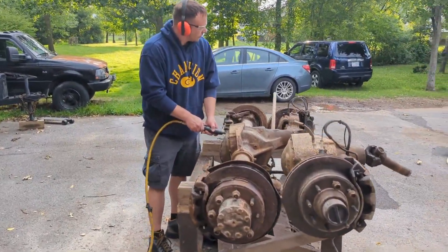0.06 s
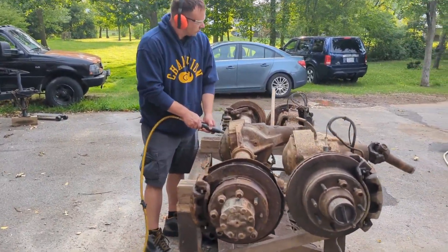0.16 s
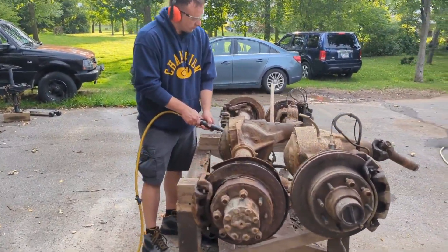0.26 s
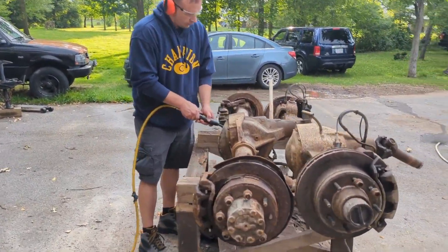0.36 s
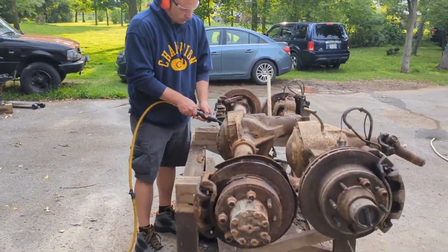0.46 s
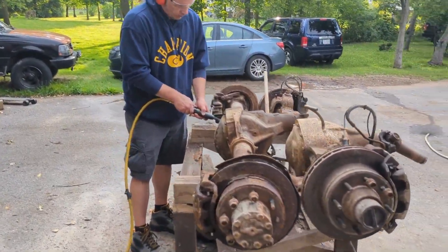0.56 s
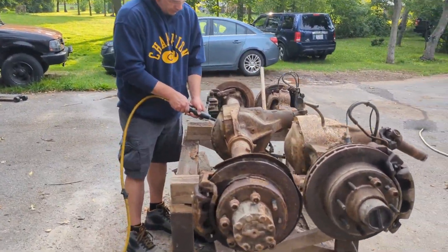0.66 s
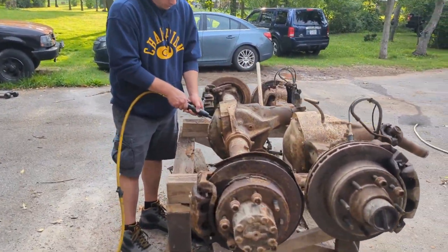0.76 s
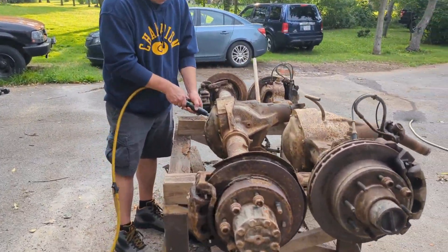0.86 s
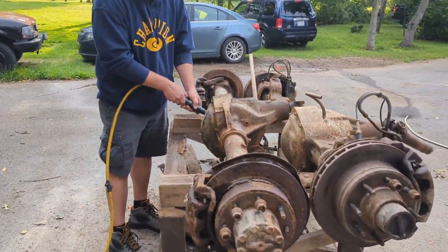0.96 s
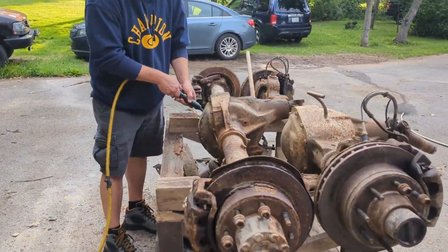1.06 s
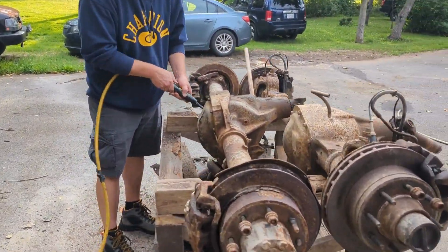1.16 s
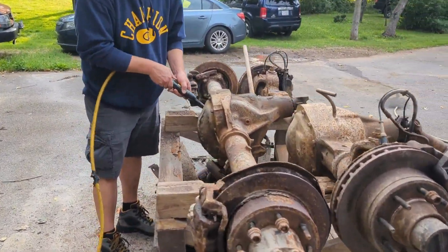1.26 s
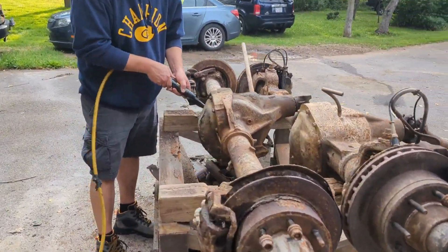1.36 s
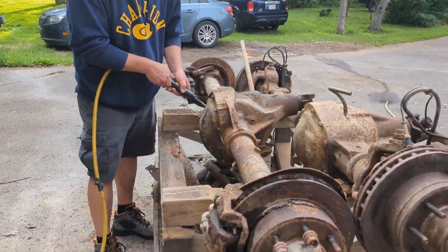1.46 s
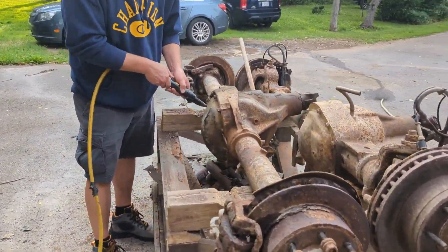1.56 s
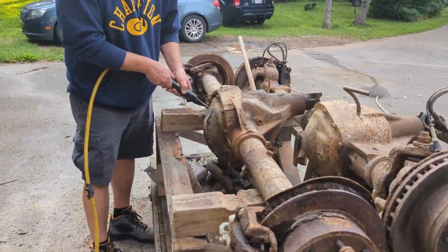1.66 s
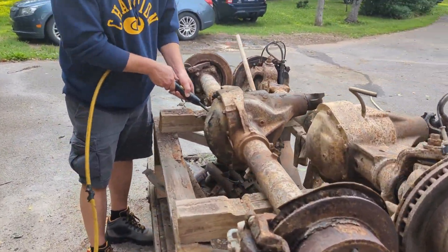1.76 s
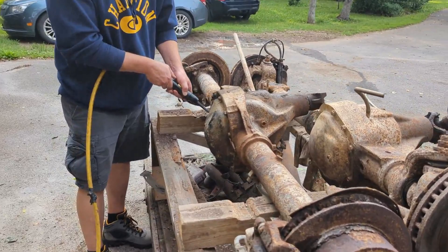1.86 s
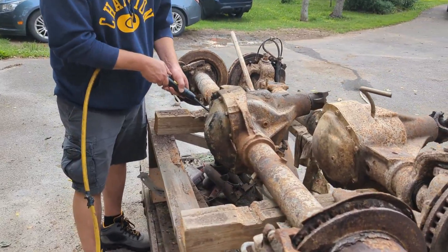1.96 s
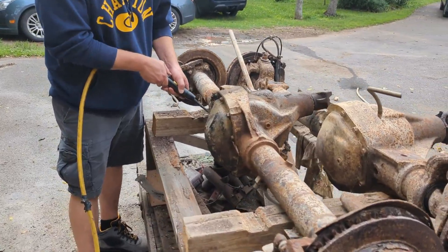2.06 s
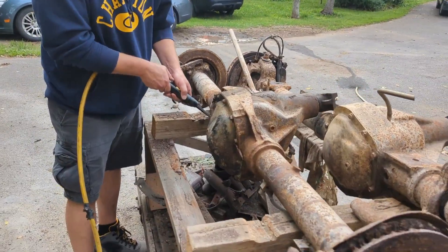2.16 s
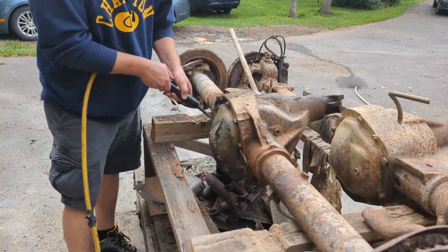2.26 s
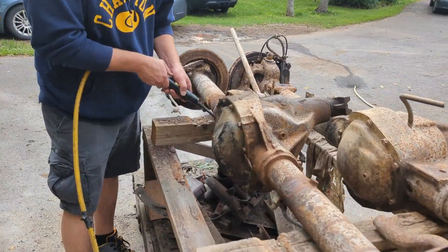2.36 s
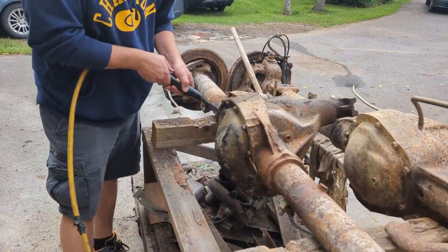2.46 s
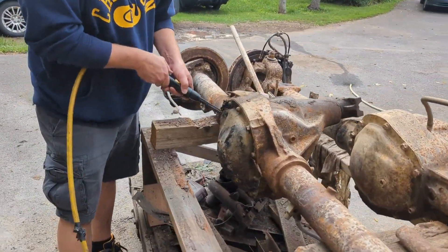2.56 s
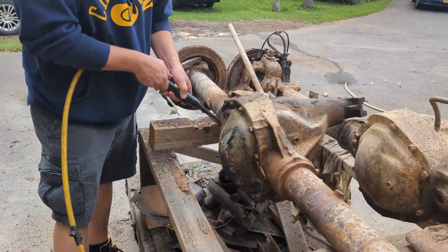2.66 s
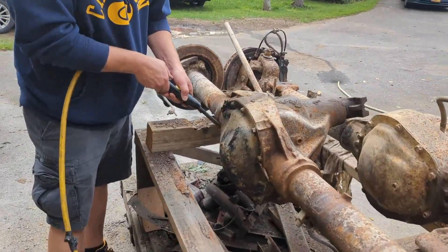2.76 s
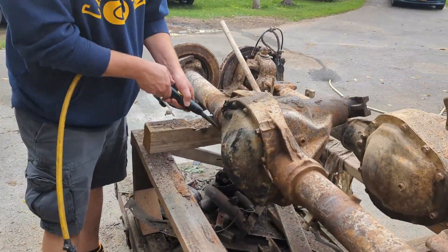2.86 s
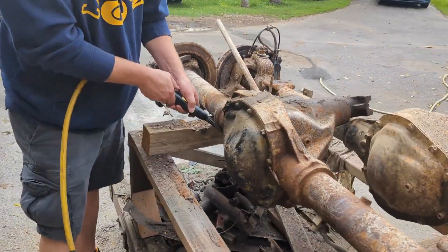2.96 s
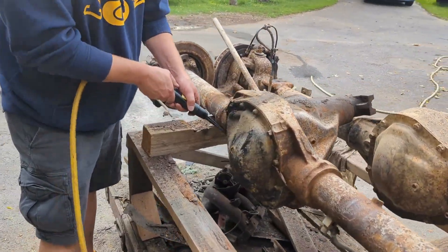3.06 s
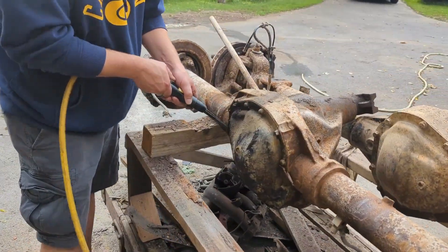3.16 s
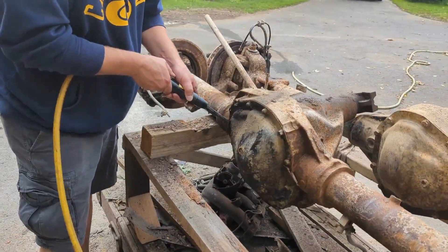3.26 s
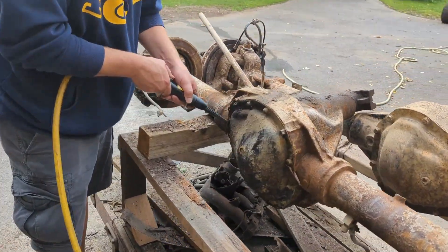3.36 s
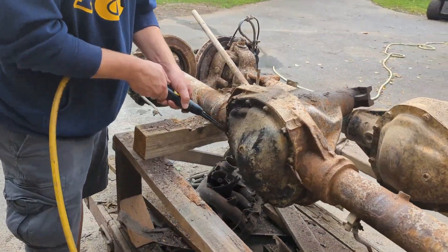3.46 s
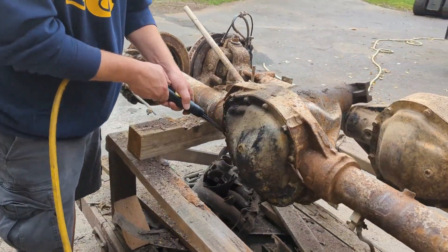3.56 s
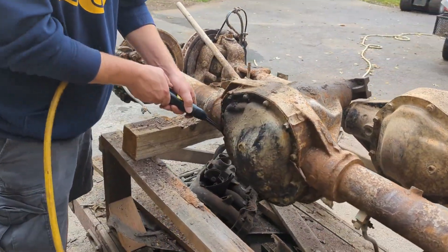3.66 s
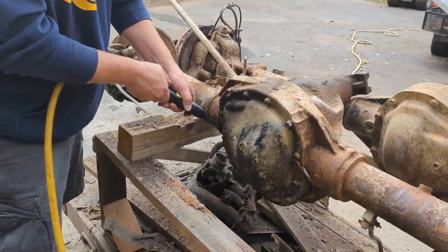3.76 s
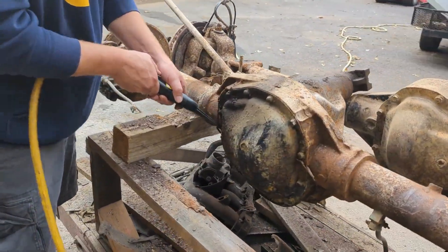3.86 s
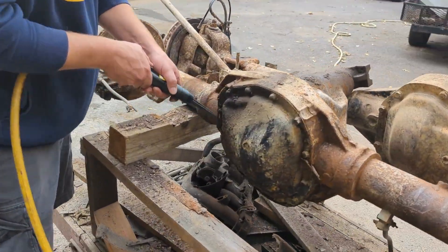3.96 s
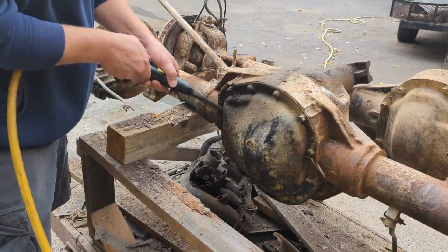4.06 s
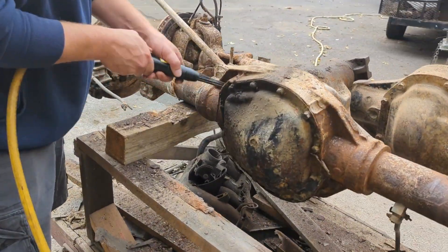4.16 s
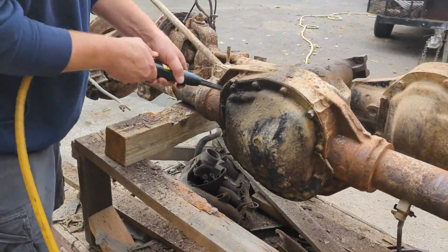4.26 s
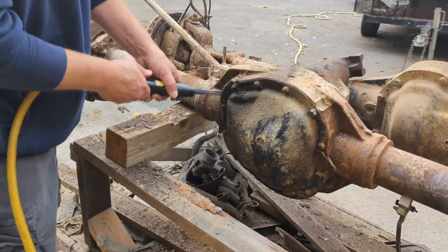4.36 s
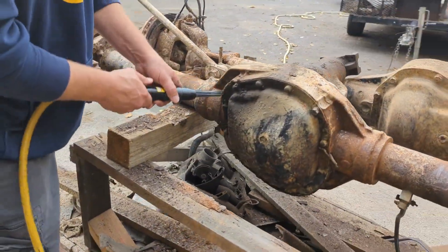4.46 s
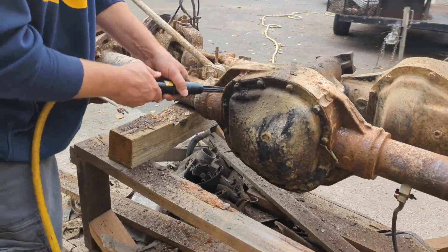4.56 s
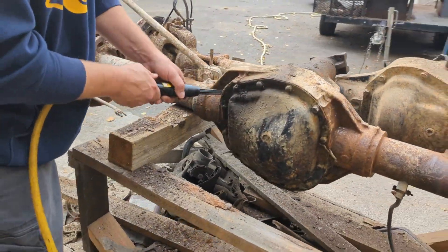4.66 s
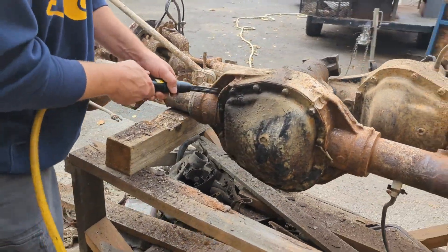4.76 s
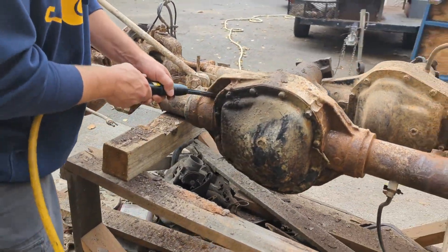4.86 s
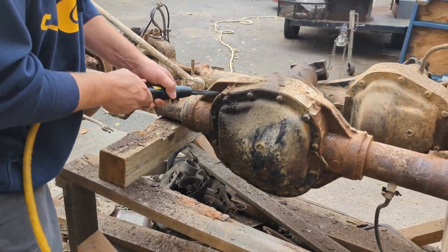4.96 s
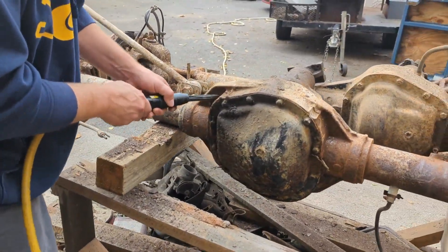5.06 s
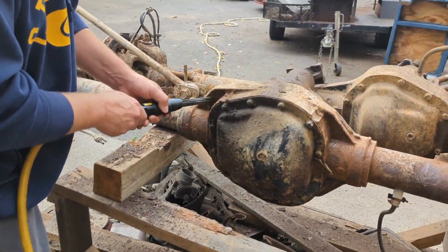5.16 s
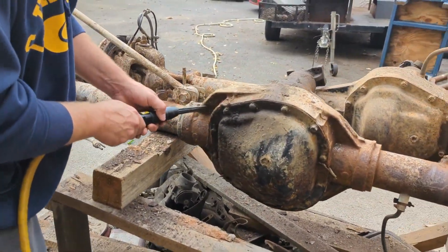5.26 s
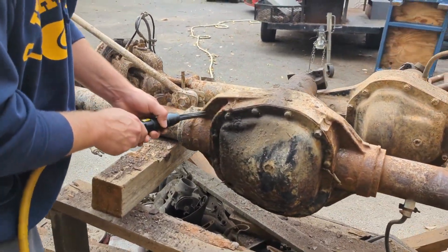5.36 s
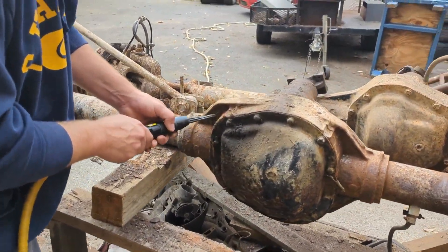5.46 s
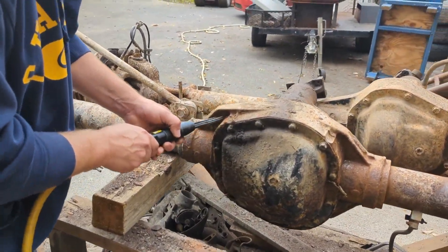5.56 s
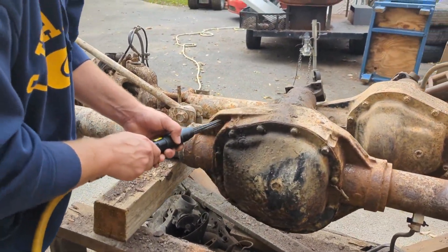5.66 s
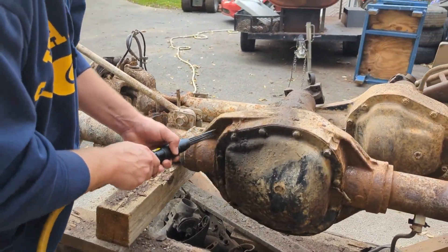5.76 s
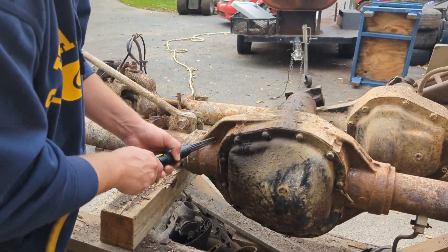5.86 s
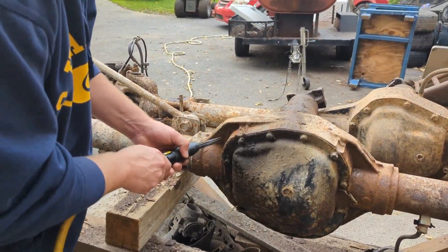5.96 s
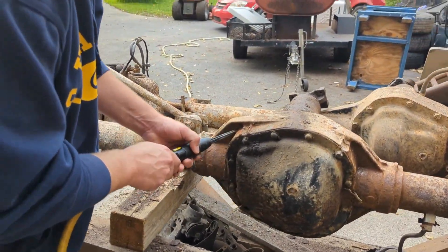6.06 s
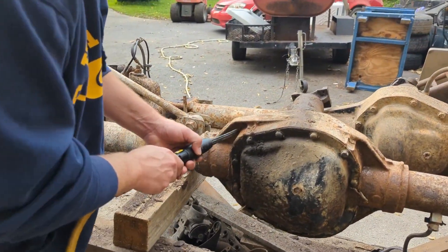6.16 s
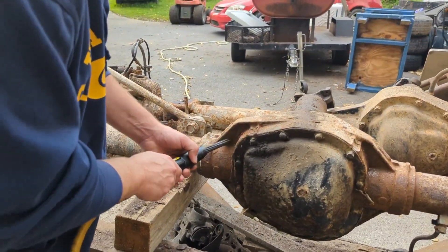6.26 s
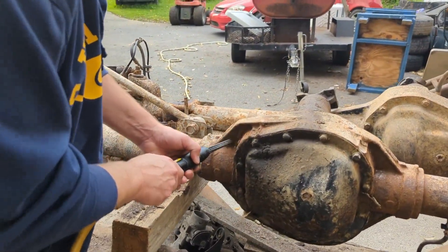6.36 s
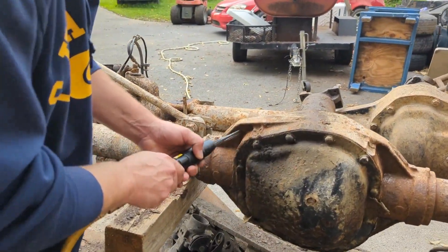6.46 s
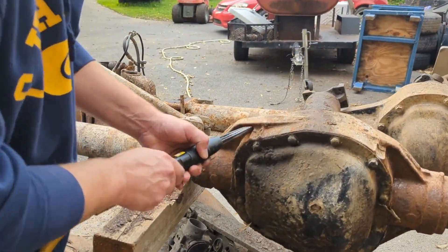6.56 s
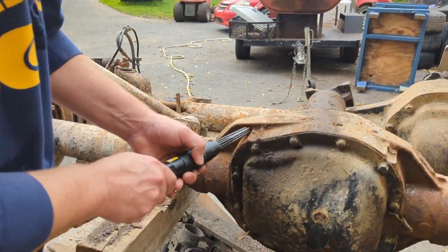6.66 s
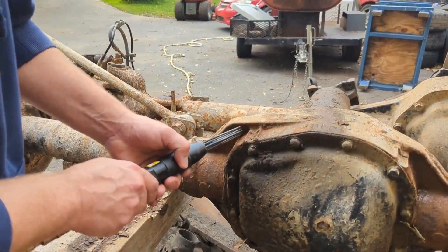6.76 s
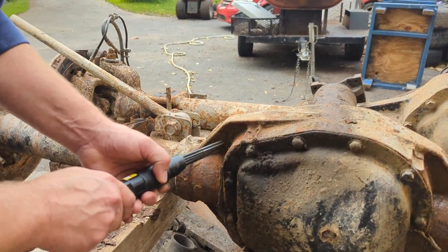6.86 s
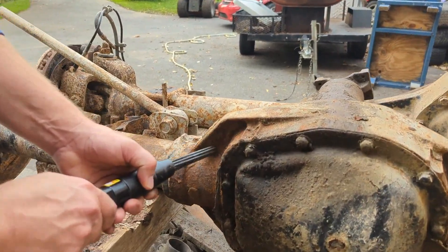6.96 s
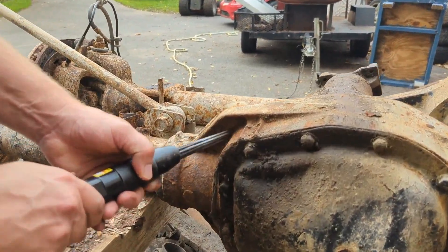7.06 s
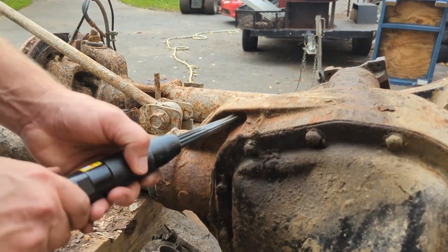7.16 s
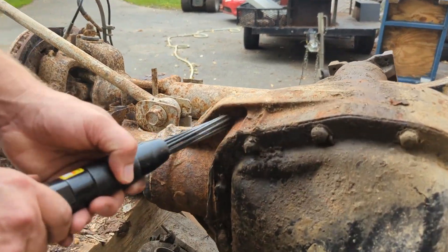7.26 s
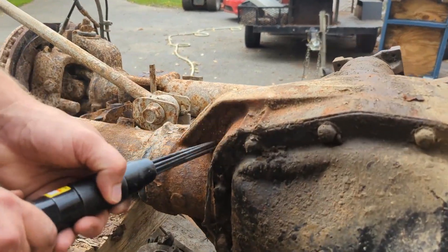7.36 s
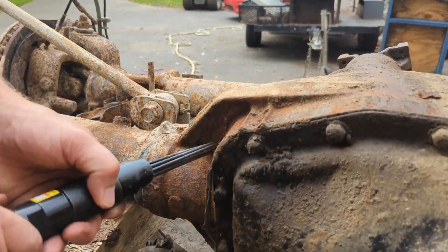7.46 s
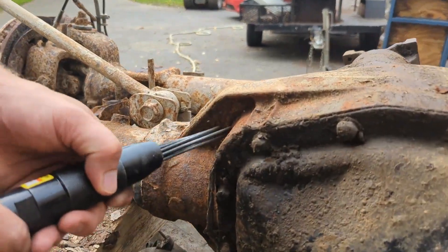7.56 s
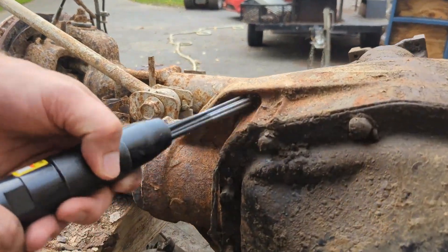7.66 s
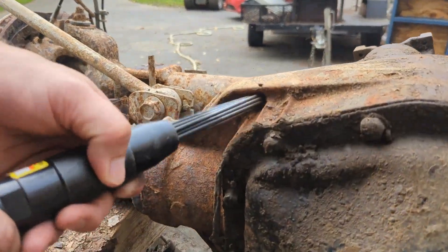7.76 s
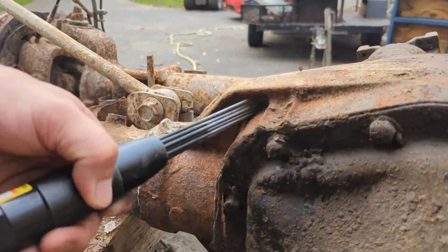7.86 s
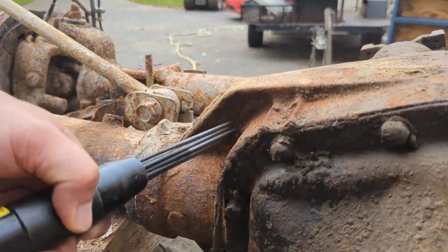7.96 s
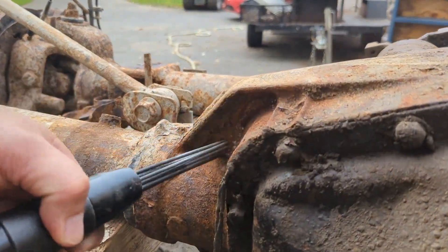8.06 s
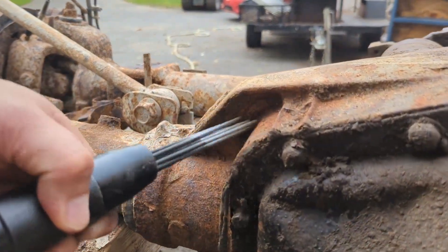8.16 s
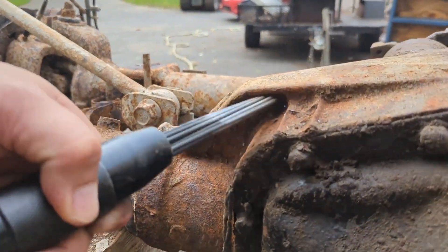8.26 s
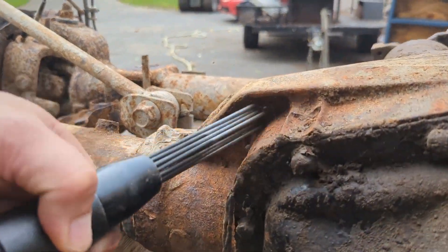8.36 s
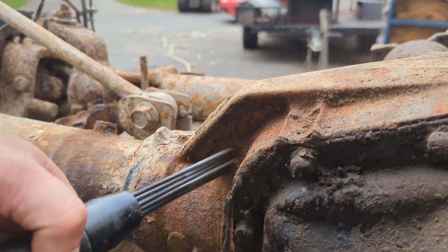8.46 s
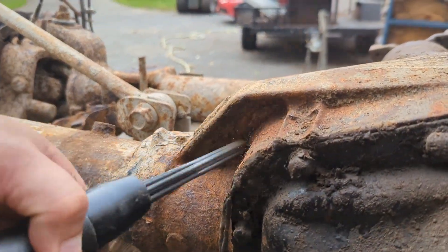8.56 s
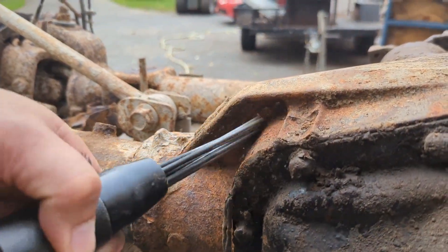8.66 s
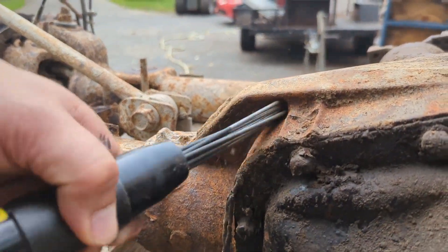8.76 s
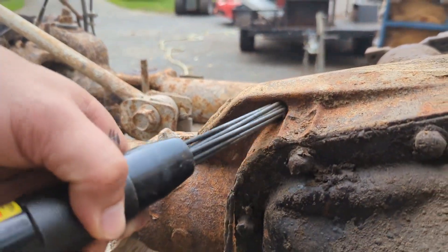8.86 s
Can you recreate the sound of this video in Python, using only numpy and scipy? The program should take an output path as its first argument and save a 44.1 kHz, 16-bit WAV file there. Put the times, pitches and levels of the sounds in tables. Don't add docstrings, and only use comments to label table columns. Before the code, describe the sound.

A pneumatic needle scaler is already running at 0 s and never stops through 8.9 s. About 65 blows a second fuse into a coarse, buzzing metallic rattle, each blow a cluster of needle hits followed by a looser rebound. From 0 to 2.2 s it is moderately loud, with low exhaust thump and hum, soft air rumbles at 0.7, 1.1 and around 2 s, and hollow housing knocks. Around 2.3 s the bass drops, briefly returns near 2.7 s, then stays thin while the needle clatter grows louder and harsher, peaking around 4 s. The pace sags slightly until 4.3 s. From 5 to 7 s the bright chatter shifts and rings as the phone swings round. After 6.9 s it rattles more; by 7.5 s low end returns, the pace quickens slightly, and a crunchy, strong hollow knock dominates from 8 s. Faint outdoor hush remains; close, dry stereo.

```python
import sys
import numpy as np
from scipy import signal
from scipy.fft import rfft, irfft, next_fast_len
from scipy.io import wavfile
from scipy.ndimage import uniform_filter1d, map_coordinates

SR = 44100
rng = np.random.default_rng(int(sys.argv[2]) if len(sys.argv) > 2 else 0)


def volts_from_db(level):
    exponent = np.asarray(level, float) / 20
    return 10 ** exponent


def materialize(psi):
    bounded = np.clip(np.atleast_2d(psi).T, -1, 1)
    quanta = np.round(bounded * 32767).astype(np.int16)
    wavfile.write(sys.argv[1], SR, quanta)


N = 392931
TIME = np.arange(N) / SR


def curves(table):
    s, *columns = np.transpose(table)
    return [np.interp(TIME, s, column) for column in columns]


def bumps(table):
    coarse = TIME[::64]
    swell = sum(height * np.exp(-((coarse - s) / half) ** 2) for s, half, height in table)
    return np.interp(TIME, coarse, swell)


def walk(rate):
    hold = int(SR / rate)
    steps = np.repeat(rng.standard_normal(N // hold + 1), hold)
    return 1.29 * uniform_filter1d(steps, hold)[:N]


def level(x, db=0):
    return x * volts_from_db(db) / np.sqrt(np.mean(x ** 2))


def colour(x, table):
    size = next_fast_len(N)
    hz, db = np.transpose(table)
    bins_hz = np.arange(size // 2 + 1) * SR / size
    gain = volts_from_db(np.interp(np.log(bins_hz + 1), np.log(hz), db))
    return irfft(rfft(x, size) * gain, size)[..., :N]


def resonate(x, hz, width):
    return signal.lfilter(*signal.iirpeak(hz, hz / width, SR), x)


def decay(x, seconds):
    return signal.lfilter([1], [1, -np.exp(-1 / (seconds * SR))], x)


def pair(likeness):
    mid, side = rng.standard_normal((2, N))
    c = np.clip(likeness, 0, 1)
    return np.sqrt(1 + c) * mid + np.sqrt(1 - c) * side * np.array([[1], [-1]])


def later(x, samples):
    right = map_coordinates(x[1], [np.arange(N) - samples], order=3, mode="nearest")
    return np.array([x[0], right])


# time_s, cut_db
GUARD = [(0, -2.5), (1.9, 1.5), (2.18, -3), (2.31, -10.5), (2.55, -13), (2.68, -1), (2.98, -11),
         (3.45, -14.5), (6.8, -13.5), (7.4, -8), (7.54, -0.5), (7.79, 1.5), (8.74, 3), (8.91, 4)]


def wind_guard():
    return curves(GUARD)[0]


# freq_hz, level_db per Hz
YARD = [(15, -55), (25, -15), (144, -14), (193, -4), (386, -8), (505, -13), (954, 0.5), (1570, -13),
        (2500, -6), (3250, -31), (5500, -120)]


def yard(guard_db):
    return level(colour(pair(1.0), YARD), -38) * volts_from_db(0.43 * guard_db)


# centre_s, half_length_s, level_db
GUSTS = [
    (.72, 0.021, 11),
    (1.12, 0.033, 8),
    (1.55, 0.034, -13),
    (1.85, 0.027, 4),
    (1.97, 0.052, 8),
    (2.15, 0.041, 11),
]


def buffet(guard_db):
    rumble = level(resonate(pair(0.08), 77, 61), -43.5)
    return rumble * volts_from_db(guard_db + bumps(GUSTS))


# multiple of the blow rate, level_db, share of the guard's cut
EXHAUST_LINES = [
    (1, -37, 1.33),
    (2, -42, 0.99),
                 (3, -37.5, 0.63), (4, -46.5, 0.64), (5, -41.5, 0.62), (6, -57.5, 0.26), (7, -63.5, 0.41),
        (8, -50, 0.18), (10, -50, 0.12)]


def exhaust(turns, guard_db):
    lines = 0
    for multiple, db, share in EXHAUST_LINES:
        line_db = db + share * guard_db + 1.47 * walk(14)
        lines = lines + volts_from_db(line_db) * np.sin(2 * np.pi * multiple * turns + 0.4 * walk(30))
    return np.sqrt(2) * lines


BLOWS_HZ = 64.5
# time_s, blows gained on the steady rate
PACE = [(0.0, -0.15), (0.059, -0.07), (0.204, -0.19), (0.308, 0.24), (0.347, 0.11), (0.413, 0.15),
        (0.642, -0.21), (0.707, -0.11), (0.748, 0.18), (0.971, 0.0), (1.07, -0.2), (1.154, -0.64),
        (1.354, -0.92), (1.49, -0.81), (1.599, 0.04), (1.751, 0.09), (1.796, 0.27), (2.084, -0.25),
        (2.227, 0.01), (2.293, -0.02), (2.399, -0.7), (2.467, -0.85), (2.782, -0.38), (2.95, -0.34),
        (3.018, -0.36), (3.358, -0.98), (3.44, -0.97), (3.535, -0.7), (3.667, -0.78), (3.707, -0.94),
        (3.771, -0.96), (3.925, -1.56), (4.213, -1.93), (4.238, -1.89), (4.261, -1.62), (4.302, -1.86),
        (4.422, -1.47), (4.503, -1.56), (4.565, -1.25), (4.583, -1.49), (4.671, -1.41), (4.769, -0.96),
        (4.966, -1.22), (5.179, -1.2), (5.458, -1.44), (5.993, -1.14), (6.057, -1.23), (6.141, -1.1),
        (6.626, -1.03), (6.853, -0.28), (7.274, -0.03), (7.639, 0.77), (7.828, 0.6), (7.957, 1.04),
        (8.027, 1.14), (8.361, 1.21), (8.447, 1.47), (8.633, 1.47), (8.685, 1.58), (8.909, 1.51)]


def piston():
    gained, = curves(PACE)
    first_blow = 0.23
    return BLOWS_HZ * TIME + uniform_filter1d(gained, size=1600) + first_blow + .002 * walk(40)


# time_s, level_db against their neighbours
MARKED_BLOWS = [(0.216, 2.5), (0.351, -1), (0.382, 0), (0.397, 0), (0.524, -2.5), (0.738, -0.5), (0.753, -1),
                (0.786, -4), (0.801, -1.5), (0.817, -0.5), (0.973, 2), (1.086, 1), (1.102, 0), (1.119, 1),
                (1.25, 1.5), (1.281, 3), (1.297, -0.5), (1.312, 2.5), (1.344, 0), (1.466, 2.5), (1.497, 0.5),
                (1.776, 2.5), (1.791, 1.5), (2.03, 1), (2.046, 0), (2.199, 0), (2.361, 2.5), (3.559, 1),
                (3.701, 0), (3.779, 1.5), (3.863, 3.5), (3.911, -3), (3.943, 1), (4.102, 3.5), (4.181, 3.5),
                (4.197, 3.5), (3.992, 1.5), (4.771, -4), (4.834, 3.5), (4.961, 2.5), (5.335, 3), (5.491, 1),
                (5.707, 3), (5.86, 3.5), (6.185, 0.5), (6.524, 2.0), (6.707, 1), (6.75, -0.5), (6.884, 2.0),
                (2.344, 2.5), (7.312, 0.5), (7.509, 2.5), (7.676, 6), (7.707, 2.5), (7.769, 1), (5.039, 2.5),
                (8.241, -3), (8.334, 1.5), (8.563, 1), (8.779, 2),
                (0.06, -2), (0.429, -3.5), (0.711, -3), (0.864, -1), (1.069, -4), (1.185, -1), (1.218, -1),
            (1.359, -2), (1.451, -5), (1.579, -9), (1.655, -3), (2.154, -2.5), (2.307, -1), (2.325, 0.5),
            (2.642, -1), (2.994, -4), (3.621, -5), (3.975, -2), (4.422, -2.5), (4.654, -2.5), (4.929, -11),
            (5.023, -0.5), (5.1, 0), (5.723, -3), (5.875, -4), (5.891, 1), (6.031, 0.5), (6.2, -1),
            (6.215, -1.5), (6.601, -1), (6.617, -1), (6.779, -2), (7.328, 0), (7.418, 0.5), (7.817, -3),
            (8.272, -4), (8.287, -1.5), (8.303, -1), (8.81, -10), (8.888, 0)]


def blow_strength(blows):
    strength_db = 1.2 * rng.standard_normal(len(blows))
    when, force_db = np.transpose(MARKED_BLOWS)
    marked = np.searchsorted(blows, (when - .5 / BLOWS_HZ) * SR)
    strength_db[marked] = 0.93 * force_db
    return strength_db


# time_s, level_db
LOOSE = [(0, 6), (.6, 4.5), (1.1, 0.5), (1.6, 2.5), (2.1, -0.5), (2.35, -2), (2.7, 0.5), (3.55, 1.5),
         (3.9, -3.5), (4.1, -1.5), (4.6, 2.5), (5.1, -4), (5.7, -3.5), (6.1, -1.5), (6.6, -1), (7.25, 0),
         (7.5, -3.5), (8.91, -3)]
# centre_s, half_length_s, level_db
SKIDS = [(1.55, .04, 2.5), (3.55, .05, 4), (4.25, 0.038, 2.5), (4.55, 0.09, 1), (4.72, 0.032, 0),
         (5.75, 0.044, 3.5), (6.7, 0.11, 2), (7.22, 0.077, 1), (7.5, 0.028, -1), (7.85, 0.03, 3.5)]


def looseness():
    return curves(LOOSE)[0] + bumps(SKIDS)


def strikes(blows, period, count, spread, rebound, rebound_db, wander, scatter_db, blow_db):
    late = np.arange(count) >= count // 2
    shape = (len(blows), count)
    delay = spread * rng.exponential(size=shape) * (1 + late)
    delay += late * rebound * (1 + wander * rng.standard_normal((len(blows), 1)))
    db = scatter_db * rng.standard_normal(shape) + blow_db[:, None]
    db += late * (rebound_db + 1.75 * rng.standard_normal((len(blows), 1)))
    place = np.clip(blows[:, None] + delay * period[:, None], 0, N - 1).astype(int)
    return np.bincount(place.ravel(), volts_from_db(db).ravel(), N)


# time_s, delayed second knock as share of a cycle, its level_db, bundle rebound as share of a cycle,
# its level_db
BOUNCE = [(0, .2, -3, 0.46, 1), (.7, 0.2, -4.5, 0.38, -0.5), (.85, 0.27, -8.5, 0.42, 4),
          (1.5, 0.28, -4, 0.37, -1.5), (2.1, 0.29, -6, 0.54, 2), (2.3, 0.53, -8, 0.35, -2),
          (2.8, 0.38, -12, 0.4, 0), (3.4, 0.5, -10, 0.27, -1.5), (4, 0.52, -8, 0.26, -1.5),
          (4.2, 0.25, -12, 0.46, 2), (4.7, 0.26, -6, 0.3, 2.5), (5.2, 0.27, -5, 0.22, 3),
          (6.1, 0.3, -5.5, 0.23, 3), (6.7, 0.29, -3, 0.29, 1), (7.3, 0.29, -3.5, 0.29, 1),
          (7.9, 0.31, -11, 0.29, 1.5), (8.91, 0.3, -6.5, 0.29, -3)]


def impacts(blows, loose_db):
    period = np.gradient(1. * blows)
    strength_db = blow_strength(blows)
    second, second_db, rebound, rebound_db = (c[blows, None] for c in curves(BOUNCE))
    rebound_db = -5.5 + rebound_db + 0.36 * loose_db[blows, None]
    hits = strikes(blows, period, count=10, spread=.045, rebound=rebound, rebound_db=rebound_db,
                   wander=.2, scatter_db=1.5, blow_db=1.63 * strength_db)
    knocks = strikes(blows, period, count=2, spread=.002, rebound=second, rebound_db=second_db,
                     wander=.05, scatter_db=.7, blow_db=.35 * strength_db)
    return hits, knocks


# centre_s, half_length_s, level_db
PRESSES = [(2.66, 0.075, 4), (2.78, 0.18, 8.5), (3.08, 0.15, 5.5), (4.22, 0.032, 4), (4.37, 0.029, 5),
           (4.58, 0.044, 5), (4.71, 0.059, 9), (5.58, 0.043, 3), (5.96, 0.096, 2.5), (6.18, 0.026, 7),
           (6.45, 0.17, 5.5), (7.15, 0.13, 3), (7.52, 0.11, 8), (7.77, 0.14, 3)]


def presses():
    return bumps(PRESSES)


# time_s, place (0 cover, 1 bowl, 2 rib, 3 cover), knock_db
SPOT = [(0, 1.78, -36.5), (1, 1.7, -33.5), (1.45, 1.51, -37), (2.08, 1.68, -32), (2.18, 1.1, -40.5),
        (2.55, 1.5, -47), (3.3, 1.73, -42.5), (4.1, 2.07, -40), (4.5, 2.39, -39.5), (5.1, 2.57, -38),
        (6.5, 2.45, -42), (7, 1.93, -42.5), (7.38, 2.07, -39.5), (7.55, 2.37, -34.5), (8.2, 2.34, -26.5),
        (8.91, 2.32, -28)]
SHELL_DB, SPOT_DEPTH_DB = [-3, 2, -3.5], 7.5


def spot_levels():
    place, knock_db = curves(SPOT)
    levels = []
    for k, db in enumerate(SHELL_DB):
        near_db = SPOT_DEPTH_DB * np.cos(2 * np.pi * (place - k) / len(HOUSING))
        levels.append(knock_db + presses() + db + near_db + 1.24 * walk(4.2))
    return levels


# freq_hz, width_hz, level_db
HOUSING = [
    [(550, 290, 0)],
    [(682.5, 85, 11.5), (767, 78, 12.5), (802, 64, 6), (775, 270, -4.5)],
    [(981, 199, 8.5), (1142, 150, 3.5), (1377, 110, -8)],
]
# centre_s, half_length_s, level_db
BOOMS = [
    [[(3.7, .4, 2), (4.7, 0.096, -1), (7, 0.21, 6), (5.1, 0.25, -5.5), (5.95, 0.093, 4.5), (8.1, .08, -1),
     (8.62, 0.12, 2.5)]],
    [[(2.7, 0.19, 4.5), (7.6, .1, -5), (8.1, 0.057, 14)], [(1.8, 0.37, 7), (2.3, 0.14, 1.5),
     (3.5, 0.18, 3)], [(.5, 0.66, 14.5), (3.75, 0.056, 12)], [(.4, 0.34, 8), (1.3, 0.18, 10),
     (2.75, 0.16, 19.5), (3.07, .08, 17), (3.75, .06, 17), (8.1, 1, 11)]],
    [[(.4, 0.73, -9), (1.33, .08, -4), (1.8, 0.27, -1.5), (2.75, 0.13, -11), (3.07, 0.056, 3),
     (7.6, 0.09, -3.5), (7.75, 0.11, 4), (8.4, 0.34, 0)], [(.6, 0.08, 6), (1.7, .4, 1), (4.35, 0.11, 8),
     (4.7, 0.078, 7.5), (8.5, 0.28, -1)], [(1.05, 0.24, 19), (2.05, 0.076, 22.5), (2.75, 0.37, 18.5),
     (3.6, 0.54, 22), (8.3, 0.52, -30)]],
]


def housing(knocks, spot_db):
    push_hz, push_width_hz = 798, 890
    push = resonate(resonate(knocks[::-1], push_hz, push_width_hz), push_hz, push_width_hz)[::-1]
    out = 0
    for k, (modes, booms, db) in enumerate(zip(HOUSING, BOOMS, spot_db)):
        shell = 0
        for (hz, width, mode_db), boom in zip(modes, booms):
            ring = resonate(resonate(push, hz, width), hz, 1.85 * width)
            shell = shell + volts_from_db(mode_db + bumps(boom)) * ring
        shell = level(shell)
        burst = level(decay(np.abs(push), 0.0041)) * pair(1.0)
        loose = resonate(burst, modes[0][0], 220) * volts_from_db(bumps(booms[0]))
        out = out - (-1) ** k * volts_from_db(db) * (shell + level(loose, -11.5))
    return out


# time_s, hammering level_db, bite into scale_db, freedom to ring_db
HAND = [(0, -29.5, -8, -26), (.35, -27.5, -6.5, -18), (.8, -30, -7, -10.5), (1.45, -24.5, -3.5, -13),
        (1.8, -22.5, -10, -29), (2.4, -22, -10, -14), (3.15, -19.5, -13, -9), (3.4, -20.5, -15, -19),
        (3.55, -19.5, -14, -16), (4, -18.5, -16, -21), (4.3, -21, -11, -11), (5.1, -20.5, -11, -9),
        (5.8, -21, -10.5, -6), (6.7, -20.5, -7.5, -19), (7.2, -20.5, -7, -11.5), (7.6, -23, -3, -6.5),
        (8.4, -22, -1, -1), (8.91, -23, -3, -10)]
# centre_s, half_length_s, level_db
DIGS = [(.37, 0.041, 3.5), (.78, 0.064, 6), (1.05, 0.15, 3), (1.46, 0.037, -1), (2.46, 0.087, 2),
        (2.72, 0.08, -3.5), (2.85, 0.039, -3), (6.35, 0.096, -1), (7.87, 0.094, -2), (4.62, 0.05, -2.5),
        (5.34, 0.062, -1), (5.46, 0.055, -1.5), (5.74, 0.021, 5), (5.8, 0.016, -1.5), (6.18, 0.067, 1),
        (6.53, 0.031, 0), (6.6, 0.03, -2), (6.83, 0.053, -1), (7.4, 0.078, -2), (7.69, 0.033, -1.5)]
RING_DB = [
    0,
    0,
    1,
]
# centre_s, half_length_s, level_db
SIDE_ON = [
    [(1.2, 0.24, 7), (3.3, 0.52, -5), (4.6, 0.16, 1), (5.3, 0.18, 9), (6.15, 0.25, 5.5), (7.05, .15, 10),
     (8.2, 0.65, -4)],
    [(1.15, 0.37, 14.5), (2.8, 0.3, -1), (4.2, .15, 1), (5.2, 0.37, 1), (8.2, 0.67, -8)],
    [(.1, .2, 5), (.45, 0.27, 5), (1.8, 0.17, 8), (2.5, .3, -3), (3.55, 0.063, 8), (4.22, 0.1, 7),
     (5.5, 0.072, 3), (6.25, .2, 5), (6.85, 0.45, 8), (7.4, 0.17, 7.5), (8.3, 0.33, -6)],
]


def needle_levels():
    hand_db, bite_db, free_db = curves(HAND)
    grip_db = 0.92 * walk(9)
    clatter_db = hand_db + 0.16 * presses() + bumps(DIGS) + grip_db
    pocket_db = 7.5 * (1 + np.tanh((TIME - 6.86) / 0.46)) / 2
    rattle_db = -8 + 0.15 * bite_db + pocket_db
    layer_db = [clatter_db + bite_db, clatter_db + rattle_db, clatter_db]
    ring_db = [hand_db + free_db + db + 1.4 * walk(3) + bumps(turn)
               for db, turn in zip(RING_DB, SIDE_ON)]
    return layer_db, ring_db


# freq_hz, level_db per Hz
CRUNCH = [(900, -26), (1350, -9), (1600, -16), (2060, -7), (2820, 0.5), (3400, 2), (4200, -0.5),
          (5460, -55), (9240, -120)]
# freq_hz, level_db per Hz
RATTLE = [(2470, -20), (4200, -1), (4640, 5), (5310, 3.5), (5860, 2.5), (7200, 3), (9360, -52),
          (15800, -120)]
# freq_hz, level_db per Hz
CLATTER = [(3240, -28), (5500, 1), (5950, -8.5), (6360, -39), (6940, -10), (8090, 9.5), (9550, 1),
           (10300, 6), (13300, 4.5), (15700, -7)]
# freq_hz, width_hz, level_db
STEEL = [
    (2165, 390, -14),
    (2480, 390, -11),
    (3500, 350, -5.5),
    (5320, 320, -8),
    (6480, 220, -9.5),
    (7750, 63, -15),
    (8220, 800, -12),
    (9230, 820, -9.5),
]
# freq_hz, width_hz
RING = [
    (10200, 200),
    (11830, 430),
    (13040, 94),
]
# centre_s, half_length_s, level_db
WEB = [(.35, 0.055, 4), (0.81, 0.053, 6), (3.453, 0.27, 11), (3.912, 0.058, 16.5), (4.21, 0.13, 4),
       (5.66, 0.15, 10), (6.703, 0.17, 10), (7.284, 0.11, 14.5), (7.757, 0.16, 7.5), (8.297, .1, 4.5)]
# centre_s, half_length_s, level_db
SINGS = [
    [(1.55, 0.092, 9), (4.7, .05, 11.5), (6.35, 0.12, -4), (8.2, 1, 8.5)],
    [(1.52, 0.095, 8.5), (2.05, 0.053, 13), (6.4, 0.2, 5.5)],
    WEB,
    [(2, 0.29, 7.5), (3.55, 0.067, 6.5), (4.65, .1, 10), (7.5, 0.081, 6), (8.1, 0.2, 2), (8.6, 0.63, 4.5)],
    [(7.25, 0.11, 8), (7.85, 0.14, 5.5), (8.35, .1, -1), (8.62, 0.08, 4)],
    [(4.7, 0.088, 2), (5.6, 0.2, 4), (6.2, 0.075, 5), (8.3, .5, 0)],
    [(3.55, 0.055, 7), (6.6, 0.2, 11.5), (7.2, 0.23, 7)],
    [(1, 0.25, 9.5), (1.85, 0.19, 4.5), (3.3, 0.2, 5.5), (4.3, 0.078, 7), (6.8, 1.6, -8), (8.5, 0.44, -4)],
]


def needles(hits, knocks, cycle, loose, layer_db, ring_db):
    sharp, dull = level(decay(hits, 0.0019)), level(decay(hits, 0.013))
    snap = level(decay(knocks, 0.00063))
    crack = level(hits - uniform_filter1d(hits, size=9), -4.5)

    crunch = (dull + 0.46 * sharp + 0.32 * snap + 0.61 * loose) * pair(0.22) + 0.91 * crack
    rattle = (sharp + 0.29 * snap + 1.36 * loose) * pair(0.21) + 0.53 * crack
    clatter = (sharp + 0.58 * loose) * pair(0.1) + 1.0 * crack
    layers = [level(colour(crunch, CRUNCH), -0.16),
              level(colour(rattle, RATTLE), -1.7),
              level(colour(clatter, CLATTER), -0.45)]

    tick = (sharp + 0.21 * snap + 0.73 * loose) * pair(0.14) + 1.4 * crack
    luck = rng.standard_normal((cycle[-1] + 1, len(STEEL) + len(RING))).T
    for (hz, width, db), sings, chance in zip(STEEL, SINGS, luck):
        band = int(hz > 4200) + int(hz > 7200)
        struck = tick * volts_from_db(2.2 * chance[cycle] + 1.8 * walk(1.857))
        mode = level(resonate(struck, hz, width), db) * volts_from_db(bumps(sings))
        layers[band] = layers[band] + mode

    rings = []
    for (hz, width), chance in zip(RING, luck[len(STEEL):]):
        rings.append(level(resonate(tick * volts_from_db(2.34 * chance[cycle]), hz, width), 1.5))
    return sum(level(x, 3.34) * volts_from_db(db) for x, db in zip(layers + rings, layer_db + ring_db))


# time_s, right port lag in samples, left minus right_db
LAG = [
    (0, 13, 0),
    (2, 14.5, -2),
    (4.7, 13.4, 0.5),
    (5.2, 3.3, -1),
    (6.3, 4.6, 0.5),
    (7.3, 5.9, -1.5),
    (8.91, 7.1, 0.5),
]


def place_needles(steel):
    lag, pan_db = curves(LAG)
    pan_db = pan_db + 2.5 * walk(10)
    return later(steel * volts_from_db(np.array([pan_db, -pan_db]) * 0.49), lag)


# freq_hz, width_hz, then passes of centre_s, half_length_s, share
SHADOWS = [
    (1636, 530, [(3.5, 0.26, 0.55), (4.4, 0.24, 0.29), (6.7, 0.11, 0.97), (7.15, 0.35, 0.83)]),
    (2780, 460, [(7.7, .3, 0.55), (8.4, 0.4, 0.42)]),
]


def ground_echo(heard):
    for hz, width, passes in SHADOWS:
        heard = heard - np.clip(bumps(passes), 0, 1) * resonate(heard, hz, width)
    return heard


def scene():
    guard_db = wind_guard()
    loose_db = looseness()
    turns = piston()
    cycle = np.maximum.accumulate(turns).astype(int)
    blows = np.flatnonzero(np.diff(cycle, prepend=-1))
    hits, knocks = impacts(blows, loose_db)

    body = housing(knocks, spot_levels()) + exhaust(turns, guard_db) + buffet(guard_db)
    layer_db, ring_db = needle_levels()
    steel = needles(hits, knocks, cycle, volts_from_db(1.06 * loose_db), layer_db, ring_db)
    return ground_echo(yard(guard_db) + later(body, 7.15) + place_needles(steel))


def band_limit(x):
    return signal.sosfilt(signal.butter(12, 15830, fs=SR, output="sos"), x)


# freq_hz, left minus right_db
PORTS = [(60, 0), (110, 2.5), (200, -0.5), (380, 1), (700, 0), (1290, -3), (2380, 1), (4400, -4.5),
         (8120, -4.5), (15000, 10)]


def record(dry):
    hz, db = np.transpose(PORTS)
    left = colour(dry[0], np.transpose([hz, db / 2]))
    right = colour(dry[1], np.transpose([hz, -db / 2]))
    clipped = np.tanh(0.79 * np.array([left, right])) / 0.81
    top_cut = signal.ellip(12, .5, 70, 15780, fs=SR, output="sos")
    mix = signal.sosfilt(top_cut, clipped)
    return band_limit(mix)


dry = scene()
out = record(dry)
materialize(out)
```